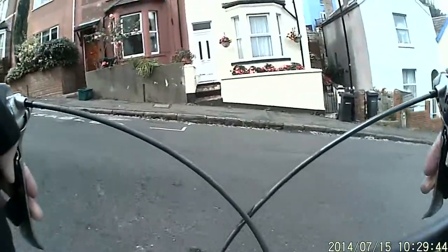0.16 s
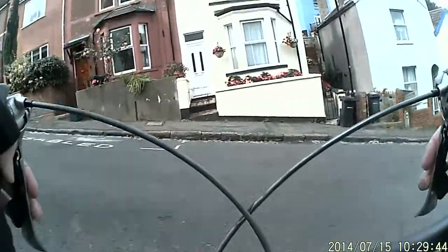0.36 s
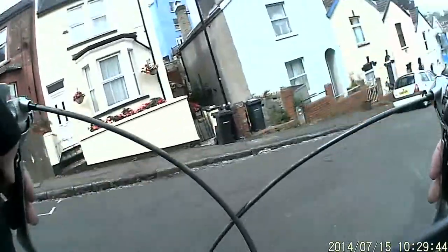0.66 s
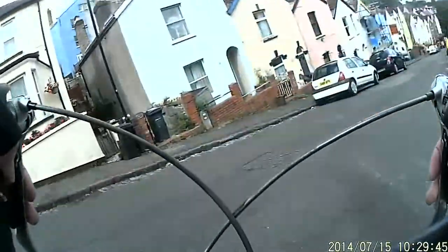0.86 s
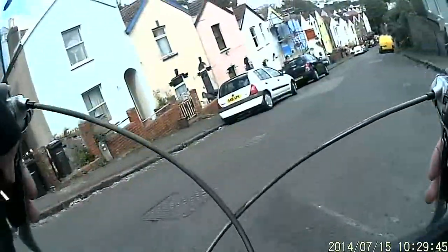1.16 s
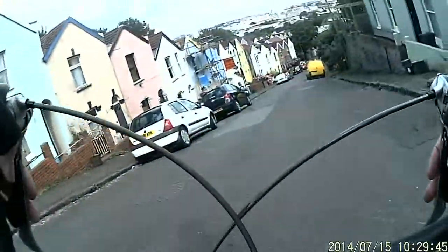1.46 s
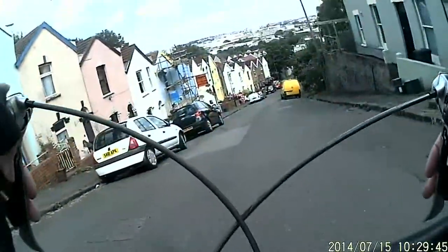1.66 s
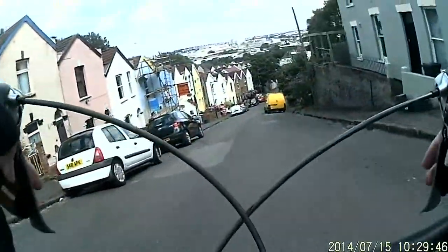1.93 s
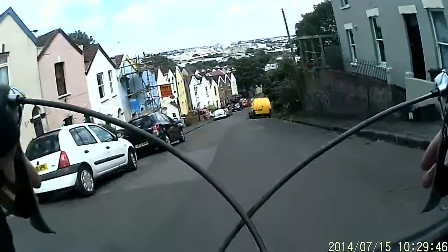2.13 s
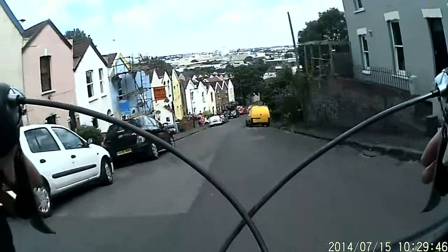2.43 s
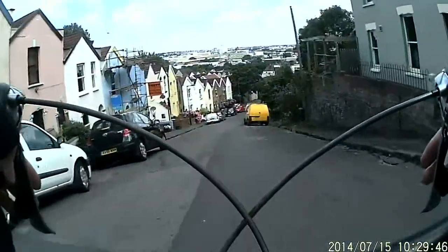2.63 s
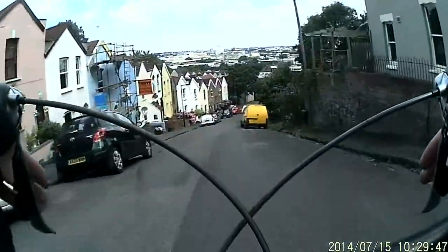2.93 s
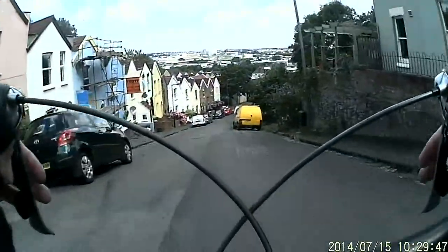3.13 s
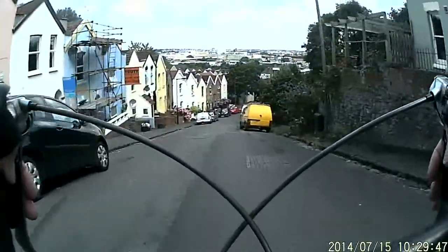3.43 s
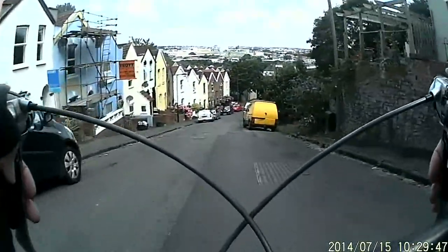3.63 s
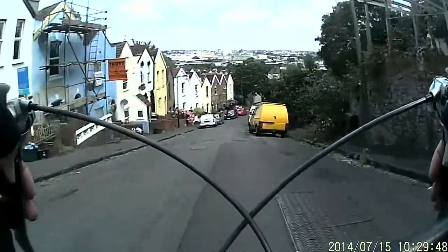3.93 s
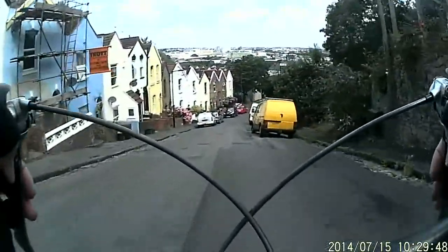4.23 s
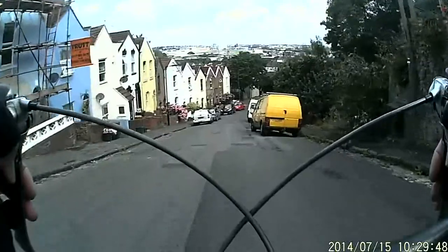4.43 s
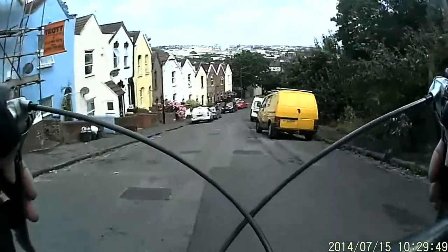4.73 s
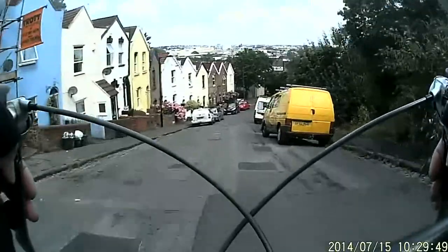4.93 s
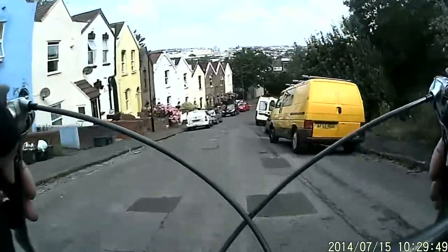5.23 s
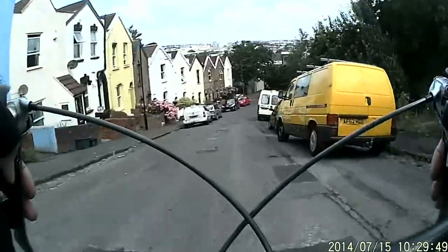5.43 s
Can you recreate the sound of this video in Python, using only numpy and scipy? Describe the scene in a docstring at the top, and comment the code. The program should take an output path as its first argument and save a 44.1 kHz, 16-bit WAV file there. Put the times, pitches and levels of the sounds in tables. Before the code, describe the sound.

A bicycle rolls down a residential street, heard from a microphone on the handlebar. Gusty bass wind and road rumble start softly and grow with speed. Early clustered knocks and two short faint brake rubs give way to a hard clack near two seconds. Small stones tick, then brake pads scrape the rim for about two seconds before closing rattles.

```python
"""A camera on a bicycle's handlebar, rolling downhill on rough asphalt and gathering speed for 5.6 s.
From the start, wind and road shake thump in the bass as slow noise, tread and grit buzz as random grains
through the mount's resonances, over a hiss that rises with loudness. Gusts and a cluster of knocks come by
0.5 s, two short brake rubs by 1 s, hard knocks near 2 s; at 3 s stones tick and the pads skim the rim, then rub
it for over 2 s as grains in high resonances; knocks, each a blow ringing the mount, and stones close the ride."""
import sys
import numpy as np
from scipy import signal
from scipy.io import wavfile
from scipy.ndimage import uniform_filter1d

SR = 44100
rng = np.random.default_rng(int(sys.argv[2]) if len(sys.argv) > 2 else 0)


def inscribe(sig):
    """Save sig as 16-bit PCM at rate SR to the path in sys.argv[1].

    A 1-D sig is mono; a 2-D sig holds one channel per row.
    Samples are clipped to [-1, 1] before scaling.
    """
    pcm = np.round(np.clip(np.atleast_2d(sig).T, -1, 1) * 32767)
    wavfile.write(sys.argv[1], SR, pcm.astype(np.int16))


def ratio(d):
    """dB to gain"""
    e = np.asarray(d, float) / 20
    return 10 ** e


N = 246519   # length in samples

# Hiss below the scene: (frequency [Hz], spectral density [dB per Hz, relative])
HISS_SPECTRUM = [(600, 7.5), (2000, 2.5), (5000, -2.5), (8000, -3), (11500, -3), (16000, -6)]
HISS_FLOOR_DB, HISS_FOLLOW_DB = -64, -52.5   # constant part; part relative to the running loudness
# Stones flicked against the frame: (time [s], strength [dB], frequency [Hz])
STONE_CLICKS = [(2.970, -37, 2000), (2.985, -35, 1800), (3.071, -32, 1700), (5.431, -29, 2000),
                (5.512, -30, 2000)]
STONE_T60_S = 0.0036
# Faint treble ticks: (level at the reference speed [dB], growth [dB per doubling of speed])
TICK_LAW, TICK_CUT_HZ = (-43.5, 13), 12000
# Rim response to barely touching pads: (frequency [Hz], width [Hz], level [dB])
SKIM_RESONANCES = [(4660, 270, 0)]
SKIM_START_S, SKIM_LENGTH_S, SKIM_DB = 3.01, 0.54, -71
# Pulls on the brake lever: (start [s], length [s], rub level [dB])
BRAKE_PULLS = [(0.618, 0.29, -67.5), (0.953, 0.36, -73.5), (3.397, 2.17, -61)]
GRAB_S, LET_GO_S, WOBBLE_DB = 0.031, 0.051, 2.06   # the rub level wavers irregularly
# Resonances of the rubbed rim: (frequency [Hz], width [Hz], level [dB])
RUB_RESONANCES = [(4420, 690, 7), (4630, 670, 3.5), (5750, 140, -4.5), (6970, 590, -11), (8600, 350, -12),
                  (11400, 1900, -14)]
# Resonances of free-rolling tread: (frequency [Hz], width [Hz], level [dB])
ROLL_RESONANCES = [(1470, 290, 5), (2260, 1100, -2.5), (2860, 230, 4.5), (3300, 300, -32)]
# Resonances of scrubbing tread: (frequency [Hz], width [Hz], level [dB])
SCRUB_RESONANCES = [(1480, 160, -0.5), (1900, 200, -5), (2707, 180, 5.5), (3030, 270, -11.5),
                    (3390, 190, -6)]
TREAD_CRAWL_DB = -76   # the tread still whispers at walking pace
SCRUB_IN_ROLL_DB, BRAKE_IN_TREAD_DB = -2, 2.5   # scrub relative to rolling; relative to the brake rub
# Mount resonances excited by grit: (frequency [Hz], width [Hz], level [dB])
GRIT_RESONANCES = [(640, 180, -4.5), (781, 182, 1), (880, 78, 9), (1223, 160, -10.5)]
# Rough asphalt, where grit and tread grow louder: (middle [s], level [dB], half length [s])
ROUGH_PATCHES = [(.42, 9, 0.029), (.80, 8, 0.044), (1.70, 6.5, 0.039), (3.80, 5, 0.044), (4.02, 3.5, 0.03),
                 (4.35, 0, .02), (4.68, 3, 0.055), (4.95, 7, 0.049), (5.23, 0, 0.029), (5.435, 4, 0.013)]
# Knocks of loose parts:
# (time [s], strength [dB], thud pitch [Hz], clack level [dB], rattle decay constant [s])
LOOSE_KNOCKS = [(0.149, -34, 670, -17, 0.00097), (.262, -38, 670, -38, 0.0015),
                (0.382, -32.5, 880, -22, 0.005), (.400, -26.5, 510, -16, 0.0031),
                (0.403, -27, 493, -13, 0.0033), (0.426, -20.5, 450, -25, 0.0015),
                (0.431, -38, 700, -7, 0.0022), (0.435, -45, 850, -8, 0.003), (0.447, -48, 600, -27, .003),
                (.456, -33.5, 990, -7, 0.0072), (0.782, -41, 603, -18, 0.0094),
                (0.805, -33.5, 600, -18, 0.004), (0.810, -38, 850, -18, .006),
                (0.845, -37, 880, -14, 0.007), (0.883, -32, 680, -7, 0.0063), (0.95, -37, 640, -32, 0.0036),
                (1.461, -52, 840, -28, 0.0022), (1.668, -37, 600, -12, 0.0095),
                (1.692, -29, 880, -16, 0.0062), (1.704, -54, 600, -8, 0.0096),
                (1.9303, -18, 640, -11.5, 0.0006), (1.9915, -11, 710, -15, 0.0012),
                (1.9955, -25, 716, -10, 0.0018), (2.003, -20, 880, -18, 0.0017),
                (2.114, -42, 600, -33, 0.002), (2.927, -35, 800, -8, 0.002), (4.672, -29, 800, -7, .006),
                (5.204, -37, 810, -4, 0.0046), (5.224, -26.5, 810, -3.5, 0.011),
                (5.414, -33, 420, -9, .006), (5.452, -19.5, 755, -11.5, 0.0051)]
# Modes of handlebar and mount: (frequency [Hz], level [dB], 60 dB decay time [s])
MOUNT_MODES = [(434, 2.5, 0.014), (529, 0, 0.045), (604, -0.5, 0.018), (766, 6, 0.016), (880, -2.5, 0.032),
               (1140, 2, 0.008), (1460, -14, 0.0035), (2196, 4.5, 0.0095), (2370, 6.5, 0.0059),
               (2704, -1, 0.017), (3120, -12, 0.0086), (3280, -8.5, 0.022), (3800, -11, 0.0079),
               (4330, -6.5, 0.0059), (5830, 12.5, 0.0026), (7340, -13, 0.0021), (11300, 9, 0.0027)]
SNAP_OVER_CLACK_DB, SNAP_PER_PEAK_DB = 3, 1.7   # the harder the blow, the brighter its snap
# Heavy blows clack lower: dB per octave for each dB over the even blow
CLACK_TILT_PER_PEAK_DB, EVEN_PEAK_DB = -3.5, -21
LOW_RATTLE, HIGH_RATTLE = 0.054, 0.1   # gain of rattle against first contact
# Road shake: (frequency [Hz], spectral density [dB per Hz, relative])
RUMBLE_SPECTRUM = [(50, -2), (90, 2), (125, -1), (200, -5.5), (350, -12.5), (550, -19.5), (700, -25),
                   (1100, -71), (2000, -43.5), (4000, -66.5), (8000, -114)]
# Wind at the microphone: (frequency [Hz], spectral density [dB per Hz, relative])
BUFFET_SPECTRUM = [(15, 0.5), (30, -3), (55, 2.5), (85, -11.5), (130, -15), (250, -55)]
# Gusts, with lulls below zero: (middle [s], level over the steady wind [dB], half length [s])
WIND_GUSTS = [(0.405, 11.5, 0.049), (0.546, -3.5, 0.048), (0.635, 11.5, 0.04), (0.773, 1, 0.03),
              (1.123, -14, 0.17), (1.478, -5.5, 0.12), (1.69, 5, 0.019), (2.168, 2.5, 0.16),
              (2.41, 0, 0.071), (2.776, -4, 0.0097), (2.844, 8, 0.016), (3.082, -5.5, 0.028),
              (3.27, 4, 0.044), (3.397, -5.5, 0.072), (3.485, 3, 0.06), (3.658, -0.5, 0.061),
              (3.787, 2.5, 0.16), (3.984, -5, 0.038), (4.324, 6, 0.01), (4.523, -1, 0.019),
              (4.537, 5, 0.015), (4.882, 9, 0.011), (4.912, -2.5, 0.017), (5.062, 7.5, 0.043),
              (5.202, 8.5, 0.069), (5.495, -7, 0.012)]
GUST_IN_ROAD = 0.35   # share of a gust's dB that reaches the rumble range
# Downhill motion: (time [s], road speed [m/s])
ROAD_SPEED = [(0, 1.13), (.3, 1.52), (.7, 1.84), (1.0, 2.48), (1.3, 2.66), (1.55, 2.89), (1.85, 3.17),
              (2.3, 3.15), (2.8, 3.96), (3.3, 4.72), (3.7, 5), (4.2, 5.5), (4.8, 6.12), (5.2, 5.78),
              (5.59, 7.45)]
REFERENCE_M_PER_S = 6   # reference speed of the growth laws
# Growth laws: (level at the reference speed [dB], growth [dB per doubling of speed])
WIND_LAW, ROAD_LAW, GRIT_LAW, TREAD_LAW = (-20, 8.9), (-23, 12.42), (-43, 9.14), (-56.5, 13.4)
OVERLOAD, TOP_HZ, OFFSET = 0.69, 13300, 0.0024   # amplitude limit, treble cut, constant offset


def rms_one(x):
    """Normalisation: scale to unit power."""
    return x / np.sqrt(np.mean(x ** 2) + 1e-20)


def in_time(rows):
    """Linear interpolation: the columns of a curve table at every sample."""
    s, *columns = np.transpose(rows)
    return [np.interp(np.arange(N) / SR, s, c) for c in columns]


def drift(rate):
    """Lowpass random process: coarse noise through a double one-pole, rms 1."""
    step = 40   # samples between coarse points
    warm_up = 2000
    r = np.exp(-2 * np.pi * rate * step / SR)
    noise = rng.standard_normal(N // step + 2 + warm_up)
    slow = signal.lfilter([1], [1, -2 * r, r * r], noise)[warm_up:]
    return np.interp(np.arange(N) / step, np.arange(len(slow)), rms_one(slow))


def banded_noise(spectrum, shared_db, own_db, rate):
    """Modulated noise: half-octave bands swell partly together, partly alone; rms 1."""
    hz_points, db_points = np.transpose(spectrum)
    octaves = np.log2(hz_points[-1] / hz_points[0])
    edges = hz_points[0] * 2 ** np.arange(0, octaves + 0.1, 0.5)
    together = drift(rate)
    white = rng.standard_normal((2, N + SR))   # the first second lets the filters settle
    out = 0
    for k, (low, high) in enumerate(zip(edges, edges[1:])):
        bandpass = signal.butter(2, [low, high], "band", fs=SR, output="sos")
        band = signal.sosfilt(bandpass, white[k % 2])[SR:]
        level_db = np.interp(np.log(low * high) / 2, np.log(hz_points), db_points)
        out = out + band * ratio(level_db + shared_db * together + own_db * drift(rate))
    return rms_one(out)


def resonate(x, peaks):
    """Parallel resonances of alternating sign, each applied twice for steep skirts; rms 1."""
    out = 0
    for k, (hz, width, level_db) in enumerate(peaks):
        r = np.exp(-np.pi * 1.5 * width / SR)   # widened, as the second pass narrows the peak
        b = (1 - r * r) / 2 * np.array([1, 0, -1])
        a = [1, -2 * r * np.cos(2 * np.pi * hz / SR), r * r]
        twice = signal.lfilter(b, a, signal.lfilter(b, a, x))
        out = out + (-1) ** k * ratio(level_db) * twice
    return rms_one(out)


def grains(per_s, spread_db, clump_db, clump_rate):
    """Random impulse train: clicks of uneven size that come in clumps."""
    sizes = ratio(spread_db * np.minimum(rng.exponential(1, N), 5)) * rng.choice([-1, 1], N)
    present = rng.random(N) < per_s / SR
    return sizes * present * ratio(clump_db * drift(clump_rate)) + 1e-18


def with_speed(law):
    """Power law: level in dB of a source that grows with road speed."""
    reference_db, per_doubling_db = law
    (speed,) = in_time(ROAD_SPEED)
    return reference_db + per_doubling_db * np.log2(np.maximum(speed, 0.1) / REFERENCE_M_PER_S)


def swells(rows):
    """Gaussian envelopes: each gust, lull or rough patch is a smooth swell in dB."""
    t = np.arange(N) / SR
    return sum(swell_db * np.exp(-((t - s) / half_s) ** 2) for s, swell_db, half_s in rows)


def microphone_hiss(dry):
    """Stationary and level-dependent noise: a constant floor plus, in power, a part that rises with loudness."""
    loudness = np.sqrt(uniform_filter1d(dry ** 2, size=2000) + 1e-12)
    level = np.hypot(ratio(HISS_FLOOR_DB), ratio(HISS_FOLLOW_DB) * loudness)
    return level * banded_noise(HISS_SPECTRUM, shared_db=0.9, own_db=1.16, rate=12)


def treble_ticks(level_db):
    """High-passed impulses: sparse faint ticks in the treble."""
    high = signal.butter(2, TICK_CUT_HZ, "high", fs=SR, output="sos")
    ticks = grains(23, spread_db=4.5, clump_db=7.0, clump_rate=5.7)
    return ratio(level_db) * signal.sosfilt(high, ticks)


def stones():
    """Damped oscillation: each stone's impact is one quickly decaying sine."""
    out = np.zeros(N + 400)
    t = np.arange(400) / SR
    for s, peak_db, hz in STONE_CLICKS:
        at = round(s * SR)
        out[at:at + len(t)] += ratio(peak_db - 60 * t / STONE_T60_S) * np.sin(2 * np.pi * hz * t)
    return out[:N]


def pad_skim():
    """Light friction: sparse contacts give a thin, patchy high whisper while the pads only touch."""
    half_s = SKIM_LENGTH_S / 2
    touching = np.exp(-((np.arange(N) / SR - SKIM_START_S - half_s) / half_s) ** 4)
    contacts = grains(4000, spread_db=-3.0, clump_db=-3.0, clump_rate=35)
    return ratio(SKIM_DB) * touching * resonate(contacts, SKIM_RESONANCES)


def lever():
    """Contact force as a gain: quick grab, uneven hold, slower exponential release."""
    t = np.arange(N) / SR
    pressure = 0
    for s, length, rub_db in BRAKE_PULLS:
        grab = np.clip((t - s) / GRAB_S, 0, 1)
        release = np.exp(-np.maximum(t - s - length, 0) / LET_GO_S)
        pressure = pressure + ratio(rub_db) * grab * release
    return ratio(WOBBLE_DB * drift(4.2)) * pressure


def brake_rub(pressure):
    """Dry friction: rubber dragged over the rim makes dense scratches in the high resonances."""
    scratches = grains(8000, spread_db=3.0, clump_db=0.8, clump_rate=30)
    return pressure * resonate(scratches, RUB_RESONANCES)


def tread_hiss(rolling, scrub):
    """Rolling and sliding friction: free tread hisses broadly, scrubbing tread rings narrow modes."""
    free = resonate(grains(5000, spread_db=1.0, clump_db=2.0, clump_rate=24), ROLL_RESONANCES)
    sliding = resonate(grains(5000, spread_db=1.5, clump_db=2.5, clump_rate=78), SCRUB_RESONANCES)
    return rolling * free + scrub * sliding


def tyre_grit(level_db):
    """Impulsive excitation: small stones under the tyres jolt the frame; the mount colours them."""
    jolts = grains(4000, spread_db=3.0, clump_db=4.0, clump_rate=2.2)
    return ratio(level_db) * resonate(jolts, GRIT_RESONANCES)


def knocks():
    """Modal synthesis: a sharp contact and short rattle ring the mount in thud, clack and snap."""
    t = np.arange(1, 1600) / SR
    mode_hz, mode_db, t60 = np.transpose(MOUNT_MODES)
    chatter = rng.standard_normal((len(LOOSE_KNOCKS), len(t) + len(MOUNT_MODES)))
    # The heavy low modes feel mostly the first blow
    loose = np.where(mode_hz < 700, LOW_RATTLE, HIGH_RATTLE)
    tilt_octaves = np.clip(np.log2(mode_hz / 2600), -0.4, 0)
    force = np.full((len(MOUNT_MODES), N + SR), 1e-18)
    for (s, peak_db, thud_hz, clack_db, rattle_s), chance in zip(LOOSE_KNOCKS, chatter):
        thud_db = -15 * np.abs(np.log2(mode_hz / thud_hz))   # soft contacts reach only nearby low modes
        snap_db = clack_db + SNAP_OVER_CLACK_DB + SNAP_PER_PEAK_DB * peak_db
        tilted_db = clack_db + CLACK_TILT_PER_PEAK_DB * (peak_db - EVEN_PEAK_DB) * tilt_octaves
        upper_db = np.where(mode_hz < 5000, tilted_db, snap_db)
        share_db = np.where(mode_hz < 1500, thud_db, upper_db)
        rattle = loose[:, None] * chance[:len(t)] * np.exp(-t / max(rattle_s, 1e-4))
        rattle[:, 0] = 1   # the first contact
        # A longer rattle spreads the same blow
        rattle = rattle / np.linalg.norm(rattle, axis=1, keepdims=True)
        blow_db = peak_db + mode_db + share_db - 2.5 + 0.5 * chance[len(t):]
        at = round(s * SR)
        force[:, at:at + len(t)] += ratio(blow_db)[:, None] * rattle
    out = np.zeros(N)
    for k, (hz, decay) in enumerate(zip(mode_hz, t60)):
        # Each mode feels only the part of the blow near its pitch
        limits = [max(hz / 2.5, 350), min(hz * 1.8, 18000)]
        reach = signal.butter(2, limits, "band", fs=SR, output="sos")
        felt = signal.sosfilt(reach, force[k, :N])
        r = ratio(-60 / (decay * SR))
        w = 2 * np.pi * hz / SR
        sign = 1 if hz < 1500 else (-1) ** k
        out += sign * signal.lfilter([0, np.sin(w)], [1, -2 * r * np.cos(w), r * r], felt)
    return out


def road_rumble(gust_db):
    """Forced vibration: road shake is low noise that grows with speed and takes a share of the gusts."""
    shake = banded_noise(RUMBLE_SPECTRUM, shared_db=0.94, own_db=1.93, rate=42.0)
    return ratio(with_speed(ROAD_LAW) + GUST_IN_ROAD * gust_db) * shake


def wind_buffet(gust_db):
    """Turbulent pressure: bass noise at the microphone grows with speed and swells in gusts."""
    buffet = banded_noise(BUFFET_SPECTRUM, shared_db=1.8, own_db=3.0, rate=27)
    return ratio(with_speed(WIND_LAW) + gust_db) * buffet


def scene():
    """Superposition: all sources reach one microphone through air and frame."""
    gust_db, rough_db, pressure = swells(WIND_GUSTS), swells(ROUGH_PATCHES), lever()
    rolling = np.hypot(ratio(with_speed(TREAD_LAW)), ratio(TREAD_CRAWL_DB)) * ratio(rough_db)
    # Scrub slightly below the rolling hiss without the brake, more with it
    scrub = np.hypot(ratio(SCRUB_IN_ROLL_DB) * rolling, ratio(BRAKE_IN_TREAD_DB) * pressure)
    small = treble_ticks(with_speed(TICK_LAW)) + stones()
    brake = pad_skim() + brake_rub(pressure)
    tyres = tread_hiss(rolling, scrub) + tyre_grit(with_speed(GRIT_LAW) + rough_db)
    bass = road_rumble(gust_db) + wind_buffet(gust_db)
    return (small + brake + tyres + knocks() + bass)[None]


def roll_off(x):
    """The treble ends steeply here."""
    return signal.sosfilt(signal.butter(12, 14030, fs=SR, output="sos"), x)


def record(dry):
    """Saturation and band limiting: peaks are rounded off, hiss joins, treble is cut, an offset added."""
    rounded = dry / (1 + (dry / OVERLOAD) ** 4) ** (1 / 4)
    lowpass = signal.butter(16, TOP_HZ, fs=SR, output="sos")
    finished = signal.sosfilt(lowpass, rounded + microphone_hiss(dry)) + OFFSET
    return roll_off(finished)


dry = scene()
out = record(dry)
inscribe(out)
```